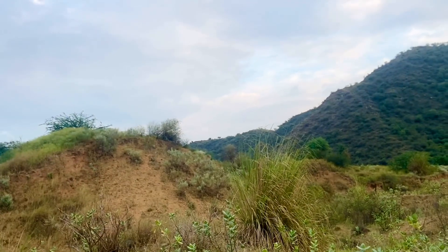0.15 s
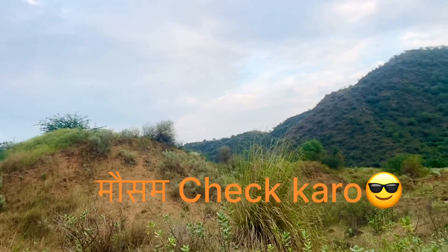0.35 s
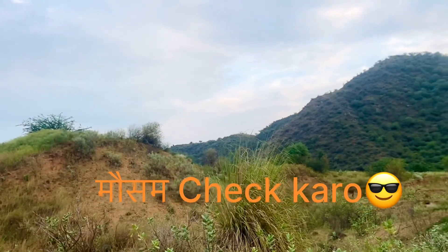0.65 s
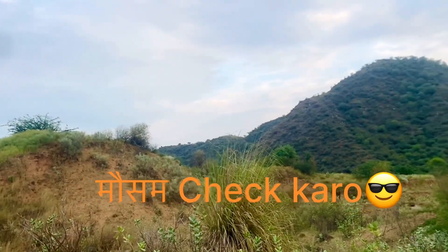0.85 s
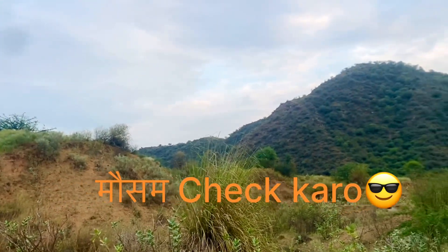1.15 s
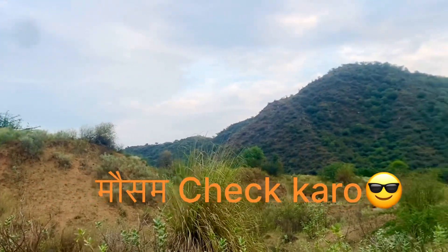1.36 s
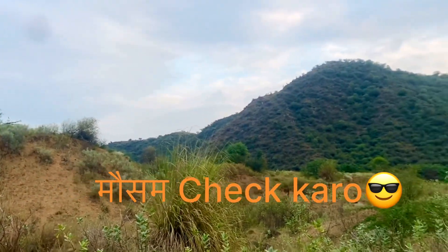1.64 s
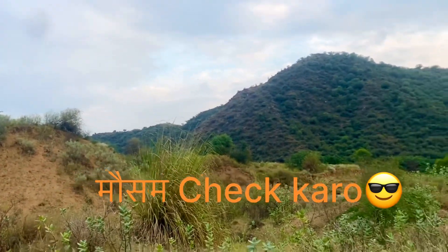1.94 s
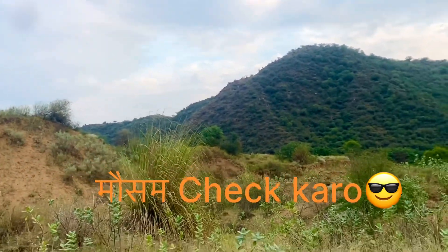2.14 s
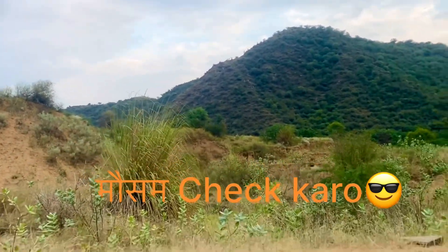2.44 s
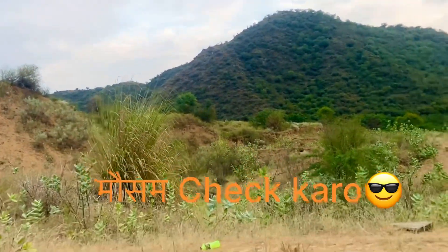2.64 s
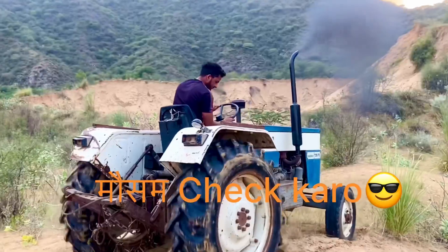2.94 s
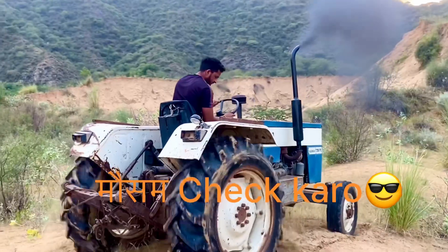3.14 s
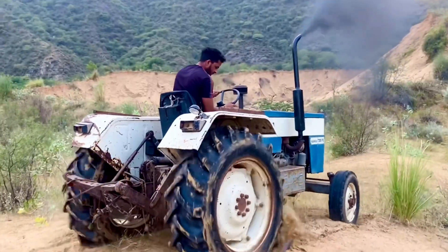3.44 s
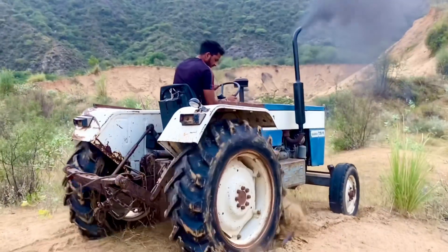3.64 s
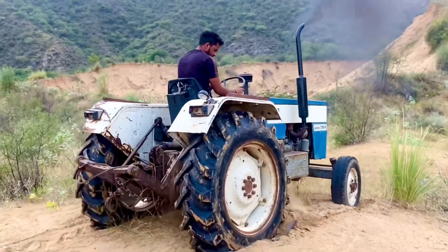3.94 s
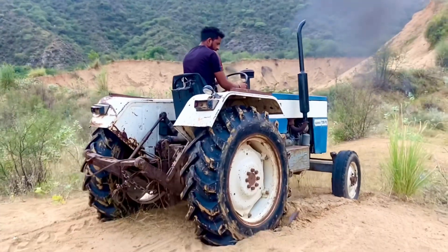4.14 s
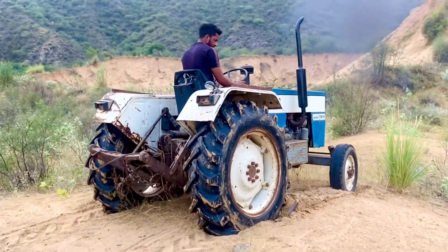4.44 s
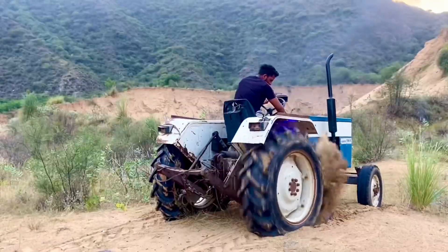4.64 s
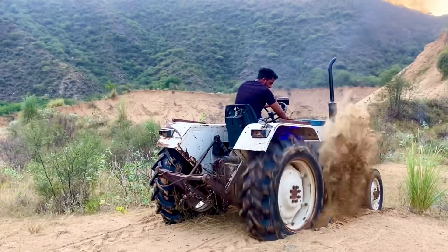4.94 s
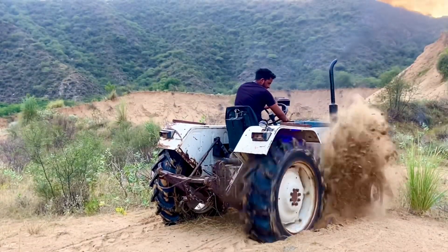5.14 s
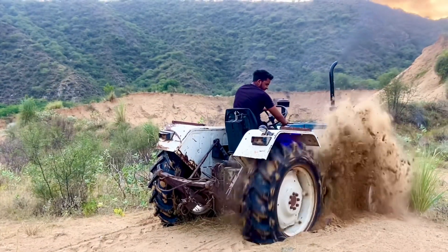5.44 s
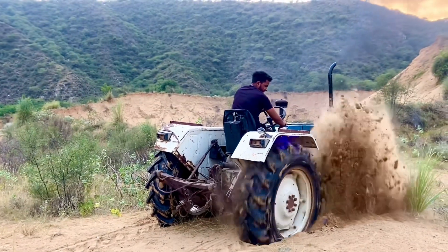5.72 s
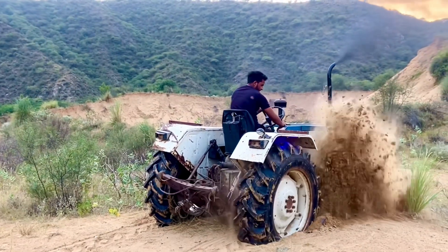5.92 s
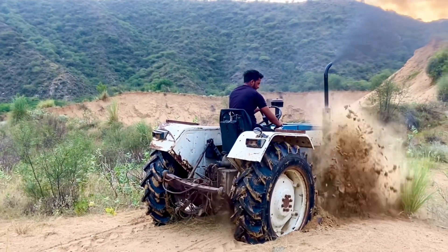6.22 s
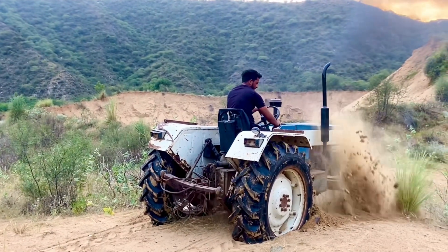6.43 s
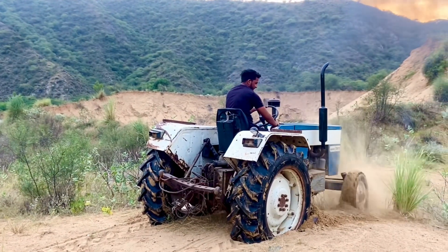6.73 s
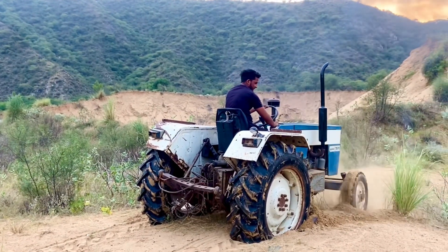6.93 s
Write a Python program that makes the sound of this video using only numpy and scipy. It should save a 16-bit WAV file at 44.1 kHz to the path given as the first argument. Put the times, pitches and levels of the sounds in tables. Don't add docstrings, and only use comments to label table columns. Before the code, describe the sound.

Outdoors on open sand, a three-cylinder diesel tractor chugs far off, gradually quickening, with faint plate pings. The sound jumps close and much louder: hard exhaust thumps, block knock and ringing panels, then a duller coast. Another jump brings a faster roar that bogs down, hitch links clanking, then races up and coasts. Handheld phone stereo with rolled-off deep bass.

```python
import sys
import numpy as np
from scipy import signal
from scipy.fft import rfft, irfft, next_fast_len
from scipy.io import wavfile
from scipy.ndimage import uniform_filter1d

SR = 44100
rng = np.random.default_rng(int(sys.argv[2]) if len(sys.argv) > 2 else 0)


def file_out(sig):
    cols = np.atleast_2d(sig).T
    lim = np.clip(cols, -1, 1)
    pcm = np.round(lim * 32767).astype(np.int16)
    wavfile.write(sys.argv[1], SR, pcm)


def boost(x):
    u = np.asarray(x, float) / 20
    return 10 ** u


N = 312228

# start [t/s], end [t/s], one loud firing [t/s], fade-in [t/s], fuel is cut [t/s]
VIEWS = [
    (0, 2.755, 1.216, 0.00062, 2.05),
    (2.742, 4.5535, 3.371, 0.025, 3.905),
    (4.556, 7.1, 6.38, 0.021, 6.43),
]
# [t/s], firing rate [f/Hz]
SPEED_FAR = [(0.0, 17.35), (0.42, 17.25), (1.01, 19.5), (1.54, 21.0), (2.0, 22.2), (2.35, 22.3),
             (2.72, 22.0)]
# [t/s], firing rate [f/Hz]
SPEED_NEAR = [
    [(2.78, 32.0), (3.7, 30.5), (3.876, 33.9), (3.954, 35.2), (4.53, 32.7)],
    [(4.6, 39.9), (5.56, 33.6), (5.85, 31.1), (6.45, 44.7), (7.08, 44.7)],
]

# [f/Hz], [level/dB per Hz]
RUMBLE = [(20, -24), (30, -3), (45, 0), (100, -3), (160, -5), (230, -9), (330, -30)]
# [t/s], peak [level/dB], pitch [f/Hz]
PINGS = [(1.5085, -46, 4760), (1.6501, -48, 4750), (2.0647, -53, 4740), (2.2019, -50, 4710)]
# [t/s], peak [level/dB], pitch of the loudest link [f/Hz]
CLANKS = [(5.3986, -36, 4600), (5.4969, -39, 5500), (5.603, -31, 4048), (5.7039, -34, 4048),
          (5.74, -38, 4600), (5.8167, -31, 3800), (5.8985, -30, 3100), (5.93, -35, 3429)]
# [f/Hz], [level/dB], time to fall 60 dB [t/s]
LINKS = [(2487, 0, .16), (3100, -3, .22), (3429, -4, .2), (4048, -3, .5), (4613, -8, .25), (4759, -9, .3),
         (5150, -12, .25), (5502, -8, .2), (5997, -11, .3), (7100, -14, .15), (8027, -15, .2)]
# [f/Hz], [level/dB per Hz]
TICK_FAR = [(2800, -30), (3300, -9), (3940, 0), (4300, -3), (4730, 0), (5500, -5), (6100, -10), (6730, -8),
            (7300, -20), (8000, -40), (12000, -52), (12600, -80)]
TICK_NEAR = [(2600, -17), (3200, -8.5), (4200, -12.5), (5500, -19), (6500, -18.5), (8100, -27),
             (10000, -45), (11800, -49), (14500, -48), (16000, -45)]
CYLINDERS_DB = [
    [0, -0.5, -0.5],
    [0, -2, 2],
]
# [f/Hz], [level/dB per Hz]
BLOCK_FAR = [(82, -38), (140, -3.5), (168, -5.5), (282, -8), (309, -6), (428, -11), (831, -8.5),
             (1180, -6.5), (1290, -8), (2510, -17.5), (3130, -37), (4070, -58), (6890, -120)]
BLOCK_PULL = [(80, -33.5), (140, -4.5), (270, -10.5), (400, -9), (555, -14), (700, -11), (1000, -11),
              (1500, -10), (1700, -18.5), (2600, -22.5), (3200, -34), (4200, -56.5)]
BLOCK_COAST = [(82, -36), (140, -2), (221, 0), (255, -7.5), (362, -6), (481, -16.5), (730, -7),
               (1360, -10.5), (1720, -16.5), (2060, -16.5), (3130, -30.5), (4070, -57.5), (6890, -120)]
# [f/Hz], width [f/Hz], [level/dB]
PANELS = [(316.6, 44.5, -11), (769, 138, -7.5), (1130.5, 144, -7), (1578, 47, -25), (1857, 110, -25)]
# multiple of the firing rate [1], [level/dB]
GEARS = [(8, -20), (10, -16), (20, -22), (24.35, -13), (36, -22)]
# exhaust at 1, 2 and 3 times the firing rate [level/dB]
ORDERS_FAR = [(-36, -31.5, -32.5), (-36, -35, -33.5)]
ORDERS_NEAR = [(-27, -17.5, -23.5), (-20, -26.5, -38)]
# [f/Hz], [level/dB over the third]
STACK_FAR = [(60, -4), (95, -1), (112, -10.5), (135, -27), (180, -24.5), (260, -36.5), (400, -28)]
STACK_NEAR = [(110, -15.5), (160, -11), (200, -15.5), (260, -31.5), (320, -18.5), (400, -29.5)]
# [f/Hz], [level/dB]
BASS_CUT = [(20, -31), (31, -20.5), (38, -8.5), (45, -2.5), (60, 0)]
# [t/s], dip [level/dB], length [t/s]
STUMBLES = [
    (0.287, -4.5, .05),
    (2.183, -7, 0.033),
    (2.454, -7, 0.054),
    (2.71, -5, 0.025),
]
# [t/s], share of full fuel [0-1], length [t/s]
PUFFS = [
    (6.58, 0.54, 0.019),
    (6.906, 0.27, 0.061),
    (7.075, 0.54, 0.042),
]
# knock [level/dB], tick over knock [level/dB], rumble [level/dB]
LEVELS_FAR = [(-38.5, -24, -75), (-40.5, -24.5, -73.5)]
LEVELS_NEAR = [(-22, -24.5, -62), (-32.5, -26, -62.5)]

# [f/Hz], left over right [level/dB]
LEAN_FAR = [(60, 2), (92, 2.5), (140, 1), (210, -1.5), (320, -4.5), (500, -7.5), (760, -11), (1760, -11.5),
            (2680, -4.5), (3500, 0)]
LEAN_NEAR = [(110, 0), (160, -1.5), (290, -5), (400, -2), (550, -5.5), (760, -7), (1040, -8), (1420, -6),
             (1950, 0), (2680, 1.5), (7000, 1.5), (8500, 0)]
# [f/Hz], how far left leads [radians]
LEAD_FAR = [(0, 0), (100, -.5), (200, -1.5), (350, -3.1), (1000, -3.6), (1500, -5), (2300, -6.8),
            (3000, -7), (8000, -18)]
LEAD_NEAR = [(0, 0), (200, -.4), (450, -.7), (780, .5), (1030, -.3), (1720, -1.3), (2240, -.6), (2840, .1),
             (6000, .6), (9000, 1.9)]
# [f/Hz], likeness of left and right [0-1]
ALIKE_FAR = [(200, 0.81), (2500, 0.94), (3200, 0.77), (7000, 0.57)]
ALIKE_NEAR = [(300, 0.98), (480, 0.81), (600, 0.71), (720, 0.65), (2500, 0.84), (3800, 0.66), (7500, 0.75),
              (9000, 1)]
# [f/Hz], [level/dB]
GAPS = [(8200, 0), (8500, -40), (9600, -40), (9900, 0), (12100, 0), (12400, -30), (13900, -30), (14300, 0)]

CUT_S, STACK_EMPTIES_S = 0.034, 0.03
RECEDE_DB_PER_S = -0.8
COAST_RATE_HZ, COAST_DB_PER_OCTAVE = 33.8, (6.5, 12, 12)
RING_LUGGING_DB, RING_FREED_DB, FREED_RATE_PER_S, RING_EASE_S = 0, -9, 8, 0.17


def read(points, hz):
    f, value = np.transpose(points)
    return np.interp(np.log(hz + 1), np.log(f + 1), value)


def amp_of(points, hz):
    return boost(read(points, hz))


def evened(x):
    return x / np.sqrt(np.mean(x ** 2) + 1e-20)


def filtered(x, points):
    size = next_fast_len(x.shape[-1])
    gain = amp_of(points, np.fft.rfftfreq(size, 1 / SR))
    return irfft(rfft(x, size) * gain, size)[..., :x.shape[-1]]


def coloured(x, points):
    return evened(filtered(x, points))


def bumps(t, rows):
    return sum(height * np.exp(-((t - s) / length) ** 2) for s, height, length in rows)


def bursts(turns, rate, pattern_db, decay_s, bed, spread_db):
    firing = np.floor(turns).astype(int)
    luck_db = spread_db * rng.standard_normal(400)[firing - firing[0]]
    since_s = (turns - firing) / rate
    flare = boost(np.array(pattern_db)[firing % 3] + luck_db) * np.exp(-since_s / decay_s)
    return (bed + uniform_filter1d(flare, size=110)) * rng.standard_normal(len(turns))


def ground_rumble(n):
    return coloured(rng.standard_normal(n), RUMBLE)


def plate():
    out, t = np.zeros(N), np.arange(SR // 8) / SR
    for s, peak_db, hz in PINGS:
        fade = boost(peak_db + 1 - 60 * t / 0.054) * np.minimum(t / 0.0021, 1)
        out[round(s * SR):][:len(t)] += fade * np.sin(2 * np.pi * hz * t)
    return out


def hitch():
    out, t = np.zeros(N), np.arange(SR // 3) / SR
    luck = rng.random((len(CLANKS), len(LINKS)))
    for (s, peak_db, struck_hz), row in zip(CLANKS, luck):
        for (hz, db, t60), chance in zip(LINKS, row):
            nearness_db = -9 * min(abs(np.log2(hz / struck_hz)) * 4, 1) + 6 * (chance - 0.5)
            fade = boost(peak_db - 2 + db + nearness_db - 60 * t / t60) * np.minimum(t / 0.0032, 1)
            out[round(s * SR):][:len(t)] += fade * np.sin(2 * np.pi * hz * t)
    return out


def valve_ticks(turns, rate, far):
    if far:
        return coloured(bursts(turns, rate, CYLINDERS_DB[1], 0.008, 0.33, 1.6), TICK_FAR)
    return coloured(bursts(turns, rate, CYLINDERS_DB[1], 0.018, 0.49, 2.8), TICK_NEAR)


def ring(x, hz, width):
    peak = signal.iirpeak(hz, hz / width, SR)
    return signal.lfilter(*peak, signal.lfilter(*peak, x))


def panel_ring(blows, turns):
    raps = evened(np.diff(np.floor(turns), prepend=np.floor(turns[0])))
    whine = sum(boost(db) * np.sin(2 * np.pi * k * turns) for k, db in GEARS)
    shaking = evened(blows) + 0.61 * raps + whine
    return sum(boost(db) * evened(ring(shaking, hz, width)) for hz, width, db in PANELS)


def block_knock(turns, rate, load, far):
    if far:
        return coloured(bursts(turns, rate, CYLINDERS_DB[0], 0.011, 0.55, 1.3), BLOCK_FAR)
    speeding_up = np.clip(np.gradient(rate) * SR / FREED_RATE_PER_S, 0, 1)
    freed = uniform_filter1d(speeding_up, round(RING_EASE_S * SR))
    ring_db = RING_LUGGING_DB + (RING_FREED_DB - RING_LUGGING_DB) * freed
    blows = bursts(turns, rate, CYLINDERS_DB[0], 0.011, 0.5, 1.1)
    pull = evened(coloured(blows, BLOCK_PULL) + boost(ring_db) * panel_ring(blows, turns))
    coast = coloured(bursts(turns, rate, CYLINDERS_DB[0], 0.02, 1.0, 0.66), BLOCK_COAST)
    return np.sqrt(load) * pull + np.sqrt(1 - load) * coast


def exhaust(turns, rate, orders_db, stack, lean, uneven_db):
    low_db = [db + read(BASS_CUT, k * rate) for k, db in enumerate(orders_db, 1)]
    levels_db = low_db + [low_db[2] + read(stack, k * rate) for k in range(4, 13)]
    wave = sum(boost(db) * np.cos(2 * np.pi * k * turns + lean) for k, db in enumerate(levels_db, 1))
    middle = np.arange(400) + np.floor(turns[0])
    luck_db = np.interp(turns, middle, uneven_db * rng.standard_normal(400))
    return np.sqrt(2) * wave * boost(luck_db)


def stack_thump(t, turns, rate, cut_s, far):
    fuel = np.clip(1 - (t - cut_s - STACK_EMPTIES_S) / CUT_S, 0, 1)
    fuel = np.clip(fuel + bumps(t, PUFFS), 0, 1)
    if far:
        fed = exhaust(turns, rate, ORDERS_FAR[0], STACK_FAR, 3.1, 1.1)
        idle = exhaust(turns, rate, ORDERS_FAR[1], STACK_FAR, 2.8, 2.7)
        return (fuel * fed + (1 - fuel) * idle) * boost(bumps(t, STUMBLES) + RECEDE_DB_PER_S * t)
    fed = exhaust(turns, rate, ORDERS_NEAR[0], STACK_NEAR, 1.47, 1.0)
    idle = exhaust(turns, rate, ORDERS_NEAR[1], STACK_NEAR, 3.0, 2.9)
    return fuel * fed + (1 - fuel) * idle


def tractor(speed, view, far):
    start, end, firing_s, _, cut_s = view
    t = np.arange(round(start * SR), min(round(end * SR), N)) / SR
    rate = np.interp(t, *np.transpose(speed))
    turns = np.cumsum(rate) / SR
    turns -= np.interp(firing_s, t, turns)
    late = turns - 0.00709 * rate
    load = np.clip(1 - (t - cut_s) / CUT_S, 0, 1)
    octaves = 0 if far else np.log2(rate / COAST_RATE_HZ)
    fed, idle = LEVELS_FAR if far else LEVELS_NEAR
    knock_db, tick_db, rumble_db = (load * on + (1 - load) * (off + slope * octaves)
                                    for on, off, slope in zip(fed, idle, COAST_DB_PER_OCTAVE))
    if far:
        knock_db = knock_db + RECEDE_DB_PER_S * t
    sound = boost(rumble_db) * ground_rumble(len(t))
    sound += boost(knock_db + tick_db) * valve_ticks(turns, rate, far)
    sound += boost(knock_db) * block_knock(turns, rate, load, far)
    sound += stack_thump(t, late, rate, cut_s, far)
    return t, sound


def ports(x, lean, lead, alike):
    size = next_fast_len(len(x) + 6000)
    hz = np.fft.rfftfreq(size, 1 / SR)
    ratio = amp_of(lean, hz) * np.exp(1j * np.interp(hz, *np.transpose(lead)))
    same = np.clip(read(alike, hz), 0, 1)
    echoes = rng.standard_normal(6000) * np.exp(-np.arange(6000) / 1200)
    scatter = evened(rfft(echoes, size).view(float)).view(complex) / np.sqrt(2)
    right = rfft(x, size) * 2 / np.maximum(abs(1 + ratio * same), 0.8)
    left = right * ratio * (same + np.sqrt(1 - same ** 2) * scatter)
    return irfft([left, right], size)[:, :len(x)]


def scene():
    out, clanks = np.zeros((2, N)), hitch() + plate()
    for speed, view, far in zip([SPEED_FAR, *SPEED_NEAR], VIEWS, [True, False, False]):
        t, sound = tractor(speed, view, far)
        first = round(t[0] * SR)
        place = slice(first, first + len(t))
        pair = (LEAN_FAR, LEAD_FAR, ALIKE_FAR) if far else (LEAN_NEAR, LEAD_NEAR, ALIKE_NEAR)
        fade_in = np.clip((t - t[0]) / view[3], 0, 1)
        out[:, place] += ports(sound + clanks[place], *pair) * fade_in
    return out


def band_limit(x):
    return signal.sosfilt(signal.butter(12, 15700, fs=SR, output="sos"), x)


def record(dry):
    thinned = filtered(dry, GAPS)
    return band_limit(thinned)


dry = scene()
out = record(dry)
file_out(out)
```